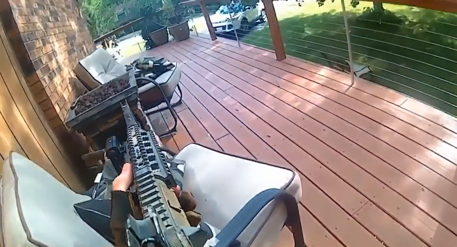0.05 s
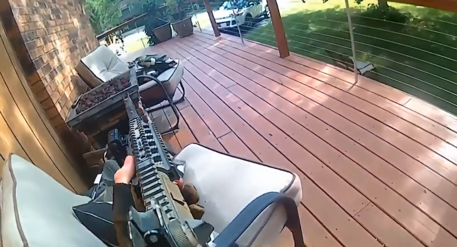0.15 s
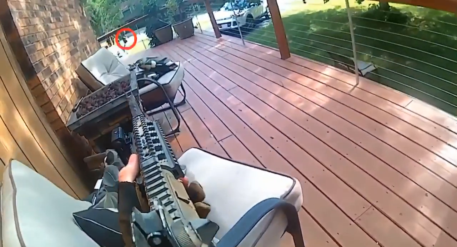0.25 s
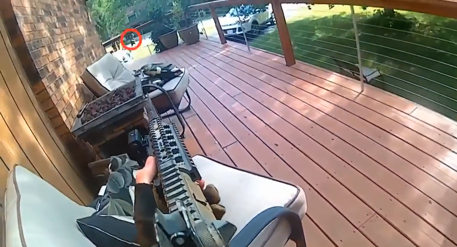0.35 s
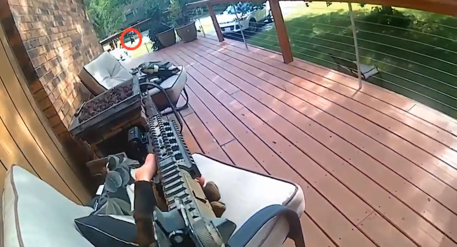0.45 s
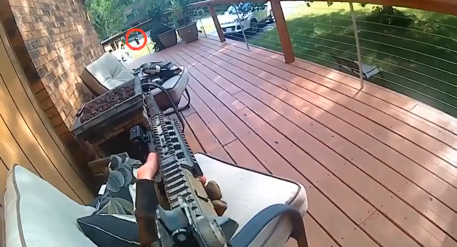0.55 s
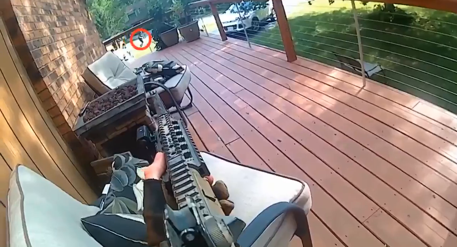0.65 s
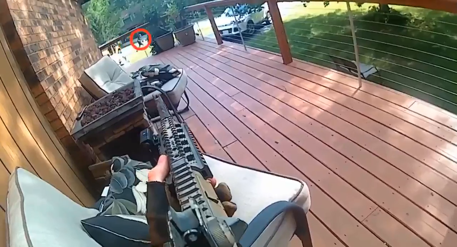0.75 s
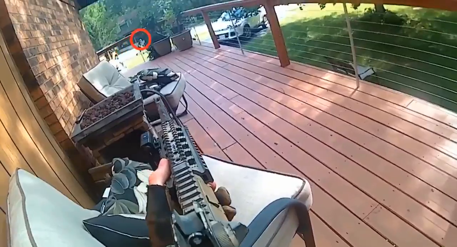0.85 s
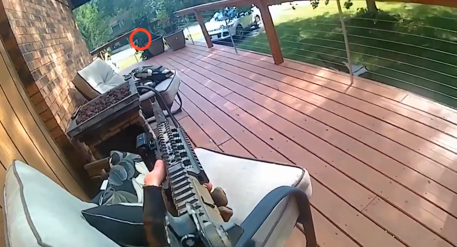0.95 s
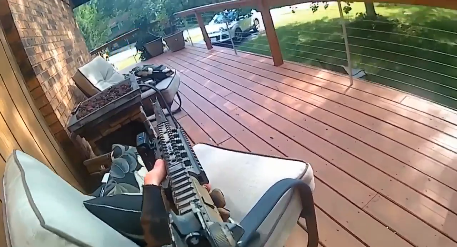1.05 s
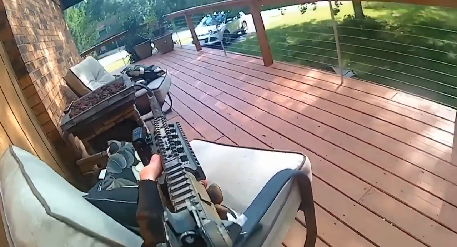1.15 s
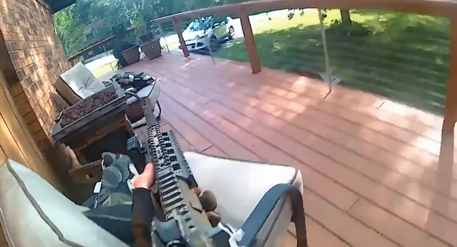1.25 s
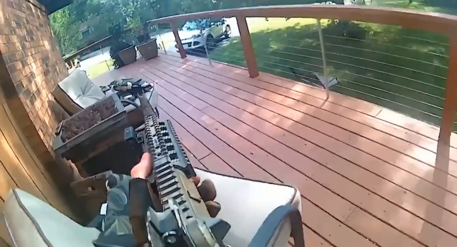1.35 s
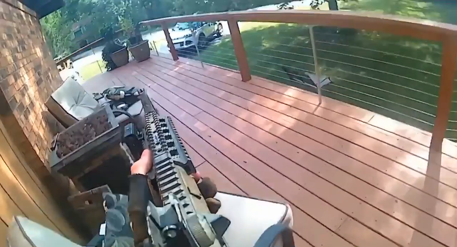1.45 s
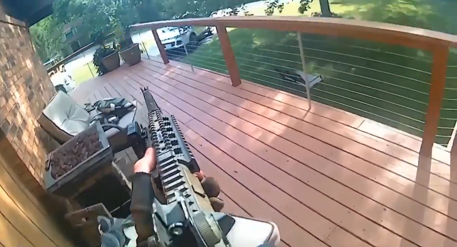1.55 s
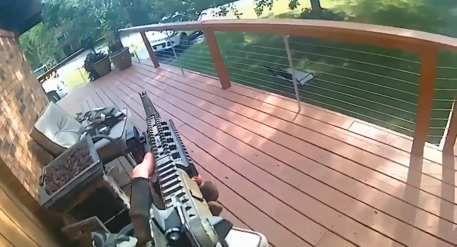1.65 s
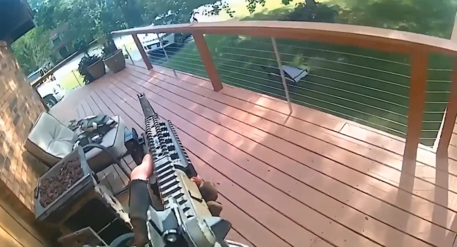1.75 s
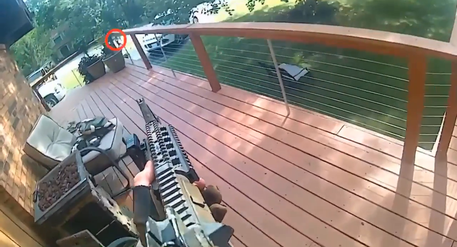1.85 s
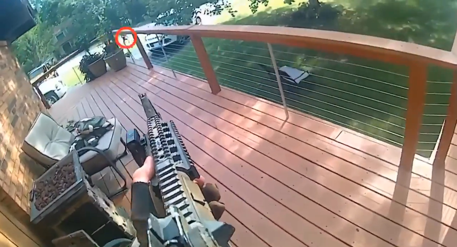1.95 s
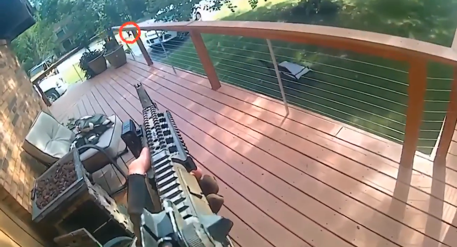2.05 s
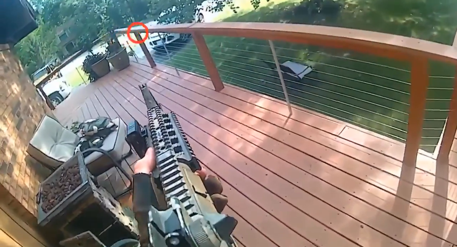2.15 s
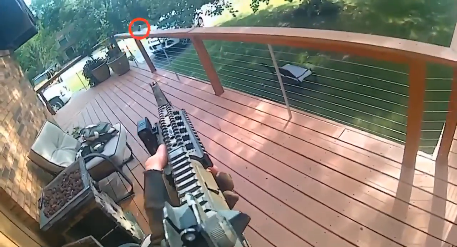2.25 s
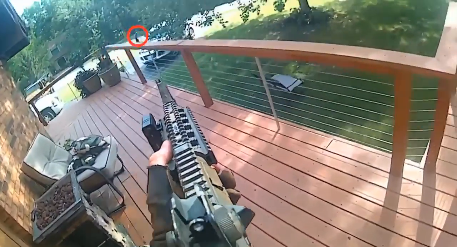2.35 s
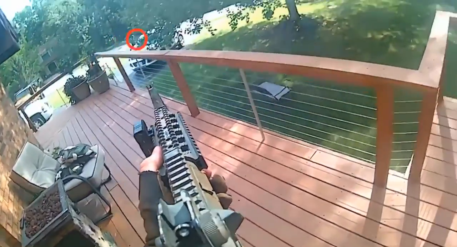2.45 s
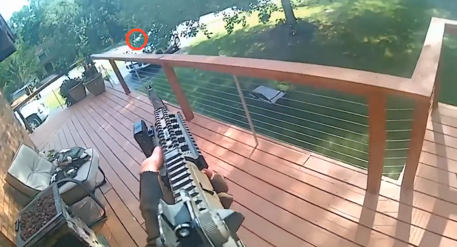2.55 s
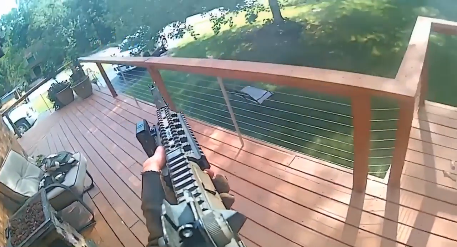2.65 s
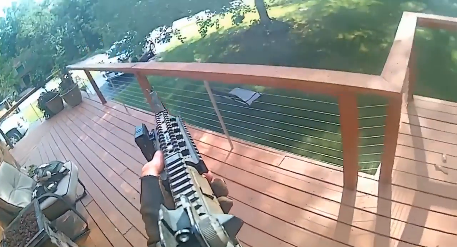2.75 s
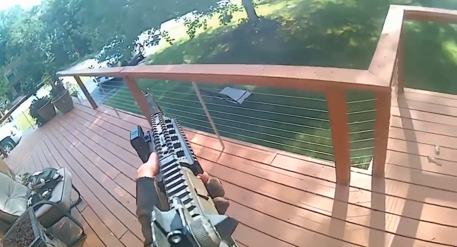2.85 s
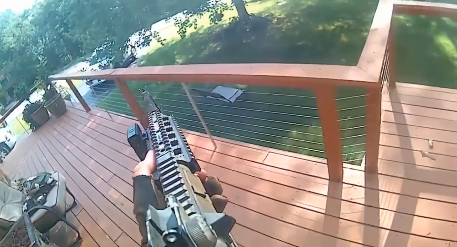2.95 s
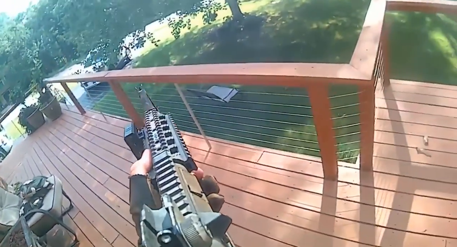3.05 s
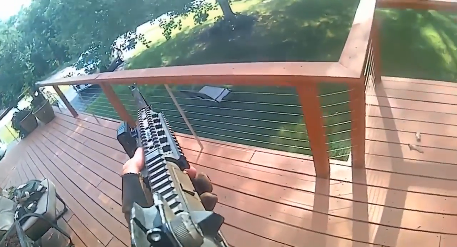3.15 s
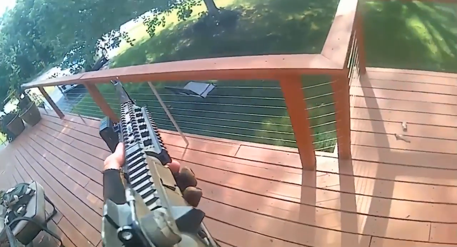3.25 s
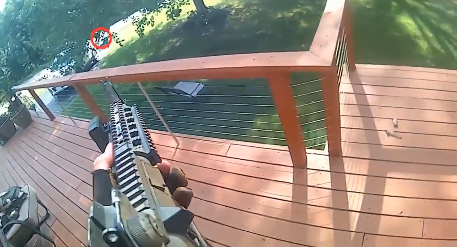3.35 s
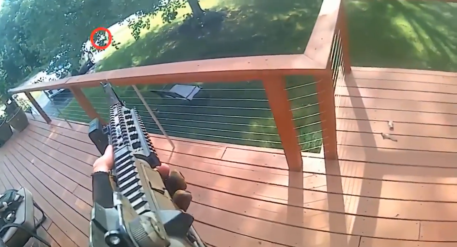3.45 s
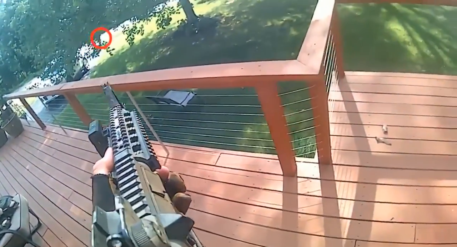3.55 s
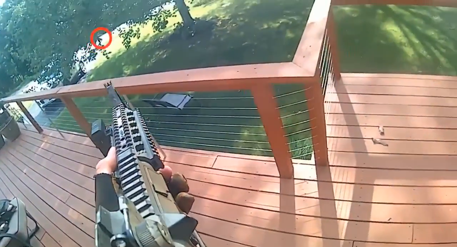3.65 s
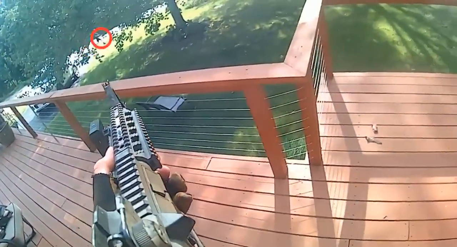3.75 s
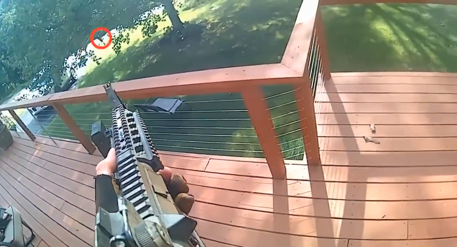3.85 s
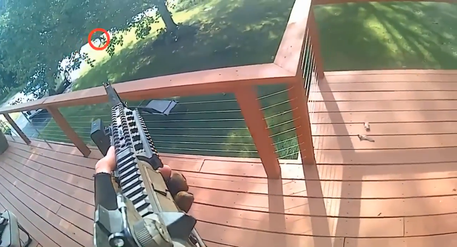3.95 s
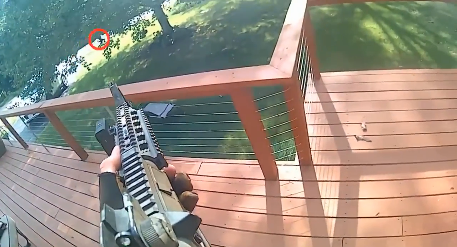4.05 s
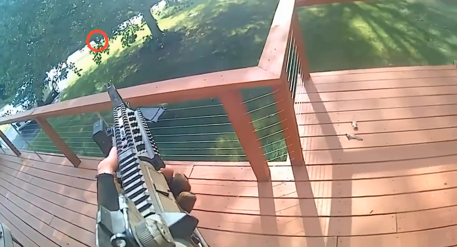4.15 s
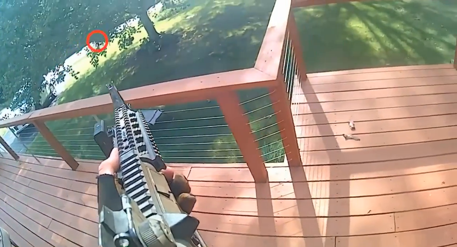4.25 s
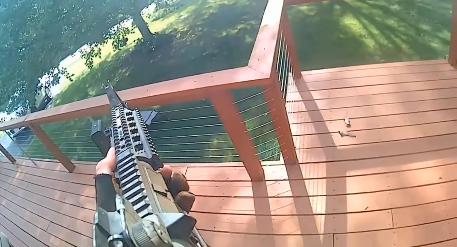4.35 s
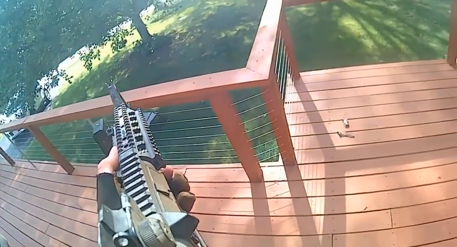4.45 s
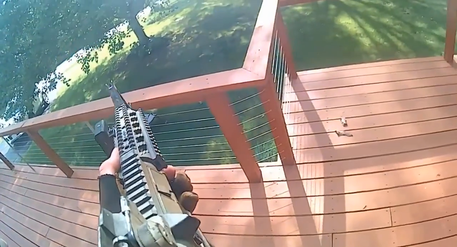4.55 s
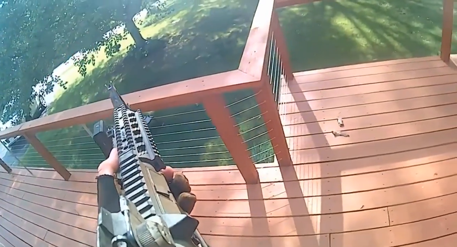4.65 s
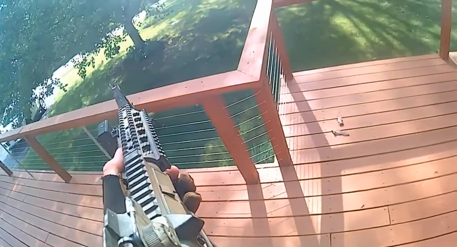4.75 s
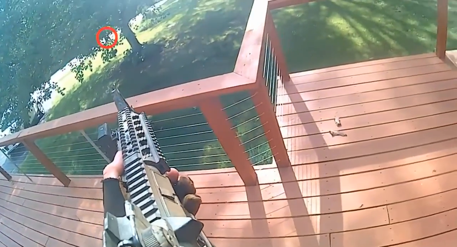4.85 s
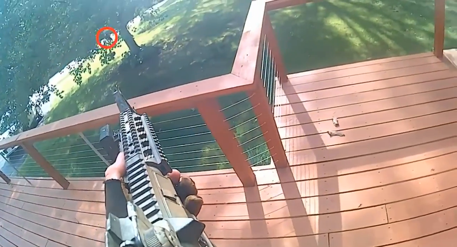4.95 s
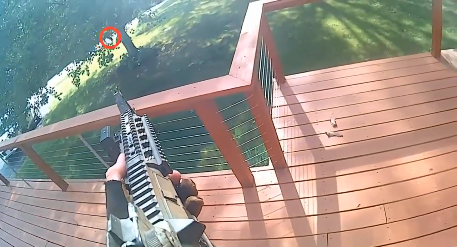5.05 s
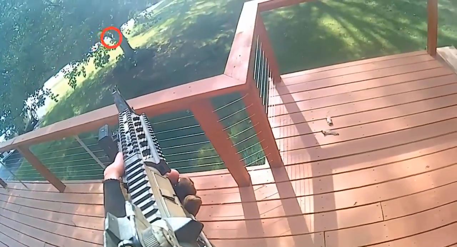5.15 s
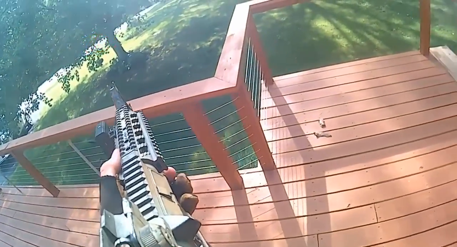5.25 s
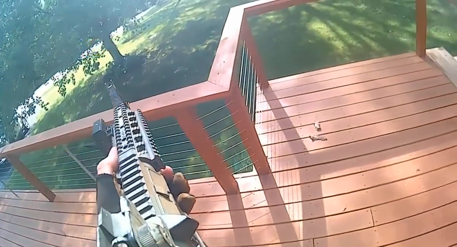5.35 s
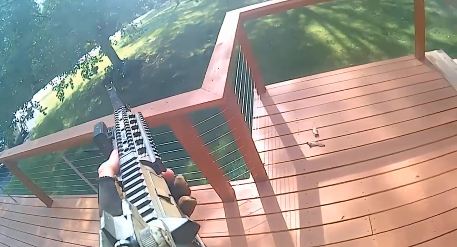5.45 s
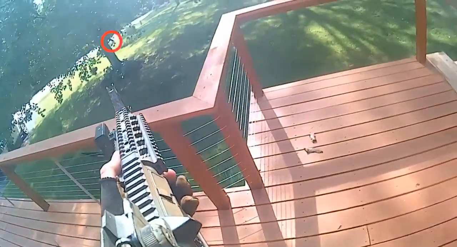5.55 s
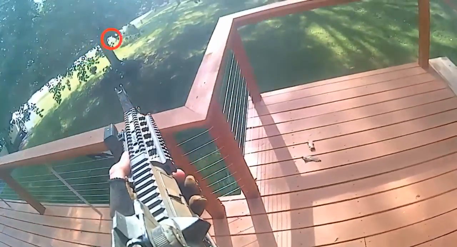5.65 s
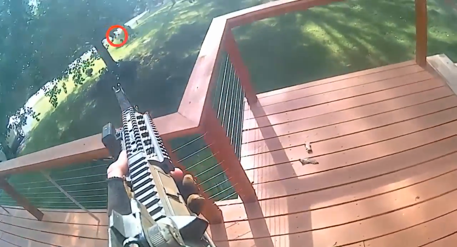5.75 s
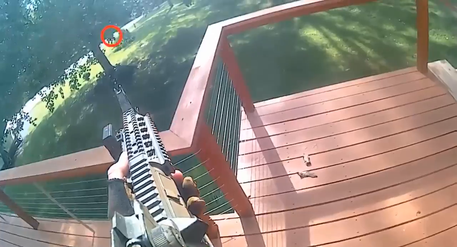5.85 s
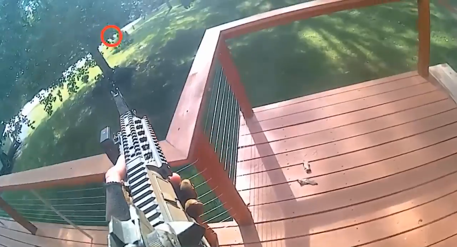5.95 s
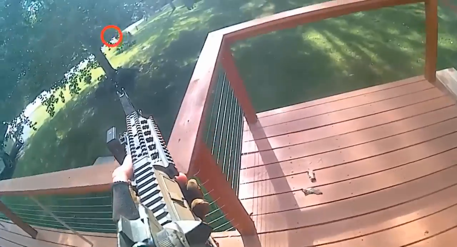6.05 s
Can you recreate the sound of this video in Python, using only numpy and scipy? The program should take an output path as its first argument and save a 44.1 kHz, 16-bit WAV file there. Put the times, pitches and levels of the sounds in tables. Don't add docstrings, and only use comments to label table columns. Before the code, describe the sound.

Outdoors on a wooden deck, a helmet microphone hears an electric toy rifle close below it, over low, lumpy wind buffeting, faint tree hush and cloth rustle. From 0.18 to 0.89 seconds five shots come almost evenly, under 0.2 seconds apart: each a short rising gear whine and rattle, a hard plasticky-metal crack, a low stock boom, a falling whirr and a small trigger click. A sharp click at 0.98 leads into dull thuds against the camera mount until 1.5, the strongest around 1.07 and 1.2 to 1.3. Four shots follow from 1.59 to 2.18, then a click and a windy pause. Seven shots run from 3.55 to 4.63, with a click at 4.74. Four more fall between 5.32 and 5.95; a last gear spin-up at 6.1 is cut off. The sound is dry, lightly saturated and coarse, with gritty mirrored treble.

```python
import sys
import numpy as np
from scipy import signal
from scipy.fft import rfft, irfft, next_fast_len
from scipy.io import wavfile
from scipy.ndimage import uniform_filter1d, minimum_filter1d, map_coordinates

SR = 44100
rng = np.random.default_rng(int(sys.argv[2]) if len(sys.argv) > 2 else 0)


def materialize(psi):
    bounded = np.clip(np.atleast_2d(psi).T, -1, 1)
    quanta = np.round(bounded * 32767).astype(np.int16)
    wavfile.write(sys.argv[1], SR, quanta)


def natural_amplitude(level_db):
    exponent = np.asarray(level_db, float) / 20
    return 10 ** exponent


N = 269892

# [t/s, level/dB]
GUSTS = [(0.0, -28), (0.61, -21), (0.71, -29), (1.12, -22), (1.5, -26), (1.79, -25), (2.33, -27.5),
         (2.68, -27), (3.07, -32.5), (3.2, -29), (3.7, -26.5), (3.97, -25.5), (4.7, -24), (4.93, -31),
         (5.2, -28.5), (6.12, -25.5)]
# [f/Hz, level/dB per Hz]
BUFFET_SPECTRUM = [(20, -43), (38, -14.5), (56, -2.5), (76, -1.5), (120, -4), (188, -10.5), (240, -13),
                   (300, -46), (450, -52)]
# [f/Hz, level/dB per Hz]
TREE_SPECTRUM = [(300, -8), (700, -0.5), (1200, 1), (2050, -2), (2600, -15.5), (3900, -20)]
# [f/Hz, level/dB per Hz]
CLOTH_SPECTRUM = [(200, -12.5), (320, 6), (600, -2), (1100, -12.5), (1800, -22.5)]

# [t/s, peak level/dB, f/Hz, swell/s]
THUDS = [(0.983, -12, 200, 0.0023), (1.069, -8, 187, 0.0044), (1.083, -19, 186, 0.0046),
         (1.099, -25.5, 96, 0.0099), (1.134, -19.5, 83.3, 0.0073), (1.187, -10, 101.3, 0.01),
         (1.244, -8, 101.2, 0.0067), (1.308, -7.5, 183, 0.0049), (1.407, -18, 108.5, 0.0074),
         (1.489, -27.5, 85.2, 0.0067), (1.841, -13.5, 106, 0.0074), (1.859, -13.5, 102, 0.024),
         (2.089, -22.5, 102, 0.034), (2.287, -20, 102, 0.008), (3.597, -25, 89.4, 0.008),
         (4.751, -27.5, 329, 0.011), (5.208, -29, 87, 0.011)]
# [t/s, peak level/dB]
TICKS = [
    (1.242, -27),
    (1.307, -23.5),
]

# [t/s, peak level/dB, low knock level/dB]
CLICKS = [(0.983, -8.5, -5), (1.072, -23.5, 8), (1.153, -16.5, -12.5), (1.161, -27, -15), (1.405, -30, 2),
          (1.899, -12.5, -1.5), (2.089, -20, 7), (2.28, -14.5, -4.5), (3.656, -12.5, -7.5),
          (4.04, -31.5, -10), (4.739, -16.5, -0.5), (5.651, -31, -6), (5.85, -18, -1), (6.049, -17.5, -5)]
# [f/Hz, level/dB, t60/s]
SEAR_MODES = [(1290, 2, 0.026), (1576, 8.5, 0.0098), (1902, -12.5, 0.053), (798, -2.5, 0.029),
              (3270, -20.5, 0.026)]

# [t/s, peak level/dB, boom level/dB, whine level/dB]
SHOTS = [(0.183, -5.5, 1.4, -9), (0.371, -4.5, -6.5, 1), (0.551, -5.5, -3, -5), (0.726, -7, 4, 0.5),
         (0.886, -4.5, -10.5, 1), (1.587, -5.5, 0, -1.8), (1.787, -5, -3.3, -3.2), (1.982, -5.5, 5.8, -6.5),
         (2.176, -5.5, 4.5, -1.5), (3.545, -6.5, -1, -5.5), (3.745, -6.5, 3.5, -3), (3.936, -6, -2, -2),
         (4.113, -4.5, -6, -1), (4.294, -6, -5.5, 0.1), (4.470, -5, -4, 0), (4.633, -5, -1, 0.5),
         (5.321, -7.5, 0.5, -3), (5.545, -8, 4.5, -3.5), (5.748, -5, 3.5, -2.5), (5.946, -5.5, -9, 1)]
# [t/s, peak level/dB, boom level/dB, whine level/dB]
CUT_SHOT = (6.14, -12, 0, 0)
# [multiple of mesh frequency, level/dB]
MESH_PARTIALS = [(.33, -14), (1, 0), (1.31, -5), (1.66, -4), (2, 0), (2.3, -16)]
# [f/Hz, level/dB]
CASE_RESPONSE = [(800, -2), (1250, 0), (1400, 1), (1500, 7), (1600, 0), (1900, -3), (2200, -7), (2500, -13),
                 (2850, -5), (3080, 0), (3300, -3), (3800, -4)]
# [f/Hz, width/Hz, level/dB]
RECEIVER_MODES = [(344.7, 31.7, 5), (1052, 154, -5), (1214, 42.5, 0.5), (1468, 78, 2), (1910, 99, -7.5),
                  (2197, 89, -9.5)]
# [f/Hz, width/Hz, level/dB]
HIGH_RECEIVER_MODES = [(2758, 580, -5.5), (3050, 194, 2), (3930, 307, 1.5)]
# [f/Hz, level/dB]
RADIATION = [(450, -0.26), (700, -1), (900, -0.94), (2150, 2.5), (2420, -5.5), (2700, -2.5), (3300, -0.5),
             (3600, -2.5)]

# [t from slam/s, f/Hz, t60/s]
SLAM_STAGES = [(-.0065, 420, .03), (-.0065, 800, .025), (-.006, 1750, .03), (.0012, 2750, .014),
               (.001, 3350, .012), (.001, 2450, .014), (.001, 930, .018), (.0035, 2080, .035),
               (.001, 260, .035), (.0036, 1270, .022), (.0045, 700, .025), (.0055, 370, .05),
               (.0068, 1480, .035), (.005, 2900, .03), (.033, 1480, .05), (.034, 2950, .03)]
SLAM_LEVELS = [-13.5, -17, -13.5, 0.5, -14.5, -7, -2, -12, -12, 1.2, -10.5, -10, -15, -16, -14, -26]
# [f/Hz, level/dB, t60/s]
BOOM_MODES = [(102, -6.5, 0.38), (69.2, -14, 0.18), (1468, -18.5, 0.11), (381.6, -24, 0.19),
              (183, -12, 0.057)]

# [f/Hz, level/dB]
MICROPHONE = [(25, -17.5), (60, -2.5), (600, -2.12), (2400, 1), (3300, 0), (3520, -10), (3760, -5.5),
              (3960, -12)]
# [f/Hz, level/dB]
MUTING_LIMIT = [(700, -31), (2400, -30), (3100, -34), (3600, -26)]
# [f/Hz, level/dB]
OUTPUT_LIFT = [(3000, -0.21), (4800, 3.5), (9000, 1.0), (13000, 6), (15000, 1.5), (16200, -4)]

CAMERA_HZ = 8000


def unit(x):
    return x / np.sqrt(np.mean(x ** 2) + 1e-20)


def along(points, hz):
    f, v = np.transpose(points)
    return np.interp(np.log(hz + 1), np.log(f + 1), v)


def wobble(rate):
    knots = rng.standard_normal(int(N * rate / SR) + 4)
    return map_coordinates(knots, [np.arange(N) * rate / SR])


def filtered(x, response):
    m = next_fast_len(N + SR // 2)
    return irfft(rfft(x, m) * response(np.fft.rfftfreq(m, 1 / SR)), m)[..., :N]


def shaped(x, curve):
    return filtered(x, lambda f: natural_amplitude(along(curve, f)))


def resonances(modes):
    def response(f):
        total = 0
        for k, (centre, width, db) in enumerate(modes):
            damping = 1j * f * width
            total = total + (-1) ** k * natural_amplitude(db) * damping / (centre * centre - f * f + damping)
        return total
    return response


def ring(hz, db, t60, attack):
    t = np.arange(SR // 2) / SR
    return natural_amplitude(db - 60 * t / t60) * np.sin(2 * np.pi * hz * t) * (1 - np.exp(-t / attack))


def add(track, s, sound):
    part = track[max(round(s * SR), 0):][:len(sound)]
    part += sound[:len(part)]


def wind():
    calm_db = -28
    trees_db, trees_grow = -56, 1.3
    cloth_db, cloth_grows = -52, 1.55

    def noise(spectrum):
        return shaped(rng.standard_normal(N), spectrum)

    buffet = unit(noise(BUFFET_SPECTRUM) * natural_amplitude(1.2 * wobble(14) + 2.2 * wobble(40)))
    trees = unit(noise(TREE_SPECTRUM) * natural_amplitude(1.0 * wobble(16)))
    cloth = unit(noise(CLOTH_SPECTRUM) * natural_amplitude(2.5 * wobble(30)))
    buffet_db = np.interp(np.arange(N) / SR, *np.transpose(GUSTS))
    gust_db = buffet_db - calm_db
    hush = natural_amplitude(trees_db + trees_grow * gust_db) * trees
    rustle = natural_amplitude(cloth_db + cloth_grows * gust_db) * cloth
    return natural_amplitude(buffet_db + 1.0) * buffet + hush + rustle


def bumps():
    out, t = np.zeros(N), np.arange(SR // 10) / SR
    for s, db, hz, swell in THUDS:
        turns = np.cumsum(hz * (0.92 + 1.48 * np.exp(-t / 0.0019))) / SR
        envelope = ((t / swell) * np.exp(1 - t / swell)) ** 2
        add(out, s, natural_amplitude(db) * np.sin(2 * np.pi * turns) * envelope)
    for s, db in TICKS:
        u = t / 0.0005
        add(out, s, natural_amplitude(db + 11.0) * (1 - u) * np.exp(-u))
    return out


def clicks():
    reset_s, reset_db, reset_knock_db = 0.097, -29.5, -13
    out = np.zeros(N)
    snaps = list(CLICKS) + [(s + reset_s, reset_db, reset_knock_db) for s, *_ in SHOTS]
    luck_db = 1.5 * rng.standard_normal((len(snaps), len(SEAR_MODES)))
    for (s, db, knock_db), row in zip(snaps, luck_db):
        for (hz, level_db, t60), shift_db in zip(SEAR_MODES, row):
            add(out, s, ring(hz, db + level_db - 9 + shift_db, t60, attack=0.00063))
        add(out, s, ring(370, db + knock_db - 2.5, 0.08, attack=0.002))
    return out


def gearbox():
    pull_s, start_s, brake_s, stop_s = -0.085, -0.069, 0.12, 0.15
    u = np.arange(round(pull_s * SR), round(stop_s * SR)) / SR

    top_hz = 1690
    spin_up = top_hz - (top_hz - 850) * np.exp(-(u + 0.063) / 0.018)
    coast = np.exp(-np.maximum(u - 0.017, 0) / 0.076)
    speed = np.maximum(spin_up * coast, 200)
    ends_db = np.interp(u, [pull_s, start_s, brake_s, stop_s], [-17.5, 0, 0, -17.5])

    whine_db, unloaded_db = -25.5, -10.5
    released = np.clip((u + 0.013) / 0.02 + 0.5, 0, 1)
    growth = np.where(u < 0, 1, 1.2)
    load = natural_amplitude(ends_db + whine_db + released * unloaded_db) * (speed / top_hz) ** growth
    load = load / (1 + (850 / speed) ** 8)

    rattle_db, coasting_db = -25.5, -34.5
    rise_db = 117.5 * u
    fall_db = np.maximum(-184.5 * np.maximum(u - 0.038, 0), coasting_db - rattle_db)
    slope_db = np.where(u < 0, rise_db, fall_db)
    pick_up_db = 4.5 * np.exp(-((u + 0.039) / 0.0062) ** 2)
    power = natural_amplitude(2 * (ends_db + rattle_db + slope_db + pick_up_db))

    whine, body_power, treble_power = np.zeros((3, N))
    for s, _, _, whine_shift_db in list(SHOTS) + [CUT_SHOT]:
        tone = 0
        for multiple, db in MESH_PARTIALS:
            turns = multiple * np.cumsum(speed) / SR + rng.random()
            tone = tone + natural_amplitude(db) * np.sin(2 * np.pi * turns)
        add(whine, s + u[0], natural_amplitude(whine_shift_db) * load * tone)
        add(body_power, s + u[0], power)
        add(treble_power, s + u[0], power * (speed / 1600) ** 1.2)

    whine = shaped(whine * natural_amplitude(1.5 * wobble(90)), CASE_RESPONSE)
    body_grain, treble_grain = natural_amplitude(1.5 * wobble(200)), natural_amplitude(1.5 * wobble(200))
    body = unit(filtered(rng.standard_normal(N) * body_grain, resonances(RECEIVER_MODES)))
    treble = unit(filtered(rng.standard_normal(N) * treble_grain, resonances(HIGH_RECEIVER_MODES)))
    rattle = np.sqrt(body_power) * body + natural_amplitude(-1.0) * np.sqrt(treble_power) * treble
    return whine + shaped(rattle, RADIATION)


def piston():
    out, t = np.zeros(N), np.arange(SR // 10) / SR
    luck = rng.standard_normal((len(SHOTS), len(SLAM_STAGES), 2)) * [0.015, 1.5]
    crack_envelope = natural_amplitude(-60 * t / 0.038) * (1 - np.exp(-t / 0.00015))
    cracks = rng.standard_normal((len(SHOTS), len(t))) * crack_envelope
    recoil_turns = np.cumsum(100 + 230 * np.exp(-t / 0.0071)) / SR
    recoil = np.sin(2 * np.pi * recoil_turns) * (t / 0.004) * np.exp(1 - t / 0.0083)
    for (s, db, boom_db, *_), row, crack in zip(SHOTS, luck, cracks):
        for (lag, hz, t60), level_db, (detune, shift_db) in zip(SLAM_STAGES, SLAM_LEVELS, row):
            add(out, s + lag, ring(hz * (1 + detune), db + level_db + shift_db, t60, attack=0.0005))
        add(out, s, natural_amplitude(db + 3.5) * crack + natural_amplitude(db - 14) * recoil)
        add(out, s - 0.008, natural_amplitude(db - 13) * crack[::2])
        for (hz, level_db, t60), (detune, shift_db) in zip(BOOM_MODES, row):
            boom_level_db = db + boom_db + level_db + shift_db
            add(out, s + 0.00318, ring(hz * (1 + 0.89 * detune), boom_level_db, t60, attack=0.005))
    return out


def scene():
    return (wind() + bumps() + clicks() + gearbox() + piston())[None]


def mute_faint(x):
    hz, _, z = signal.stft(x, CAMERA_HZ, nperseg=384)
    level_db = 20 * np.log10(np.abs(z) + 1e-10)
    band_db = 10 * np.log10(uniform_filter1d(np.abs(z) ** 2, size=15, axis=0) + 1e-20)
    loud_db = -minimum_filter1d(-band_db[hz > 800].max(axis=0), size=5, origin=1)
    limit_db = loud_db + along(MUTING_LIMIT, hz)[:, None]
    kept = (band_db > limit_db) | (level_db > limit_db + 3)
    thinned = z * np.where(kept, 1, natural_amplitude(-25))
    return signal.istft(thinned, CAMERA_HZ, nperseg=384)[1][:len(x)]


def low_pass(x):
    return signal.sosfilt(signal.butter(12, 16490, fs=SR, output="sos"), x)


def record(dry):
    band = filtered(dry[0], lambda f: natural_amplitude(along(MICROPHONE, f)) * (f < 3960))
    band = band / (1 + np.abs(band / 0.95) ** 8) ** (1 / 8)
    t = np.arange(N) / SR
    sample_times = np.arange(int(t[-1] * CAMERA_HZ) + 1) / CAMERA_HZ
    samples = mute_faint(map_coordinates(band, [sample_times * SR]))
    joined = np.interp(t, sample_times, samples)
    lifted = filtered(joined, lambda f: natural_amplitude(along(OUTPUT_LIFT, f)) * (f < 16450))
    return low_pass(lifted[None])


dry = scene()
out = record(dry)
materialize(out)
```